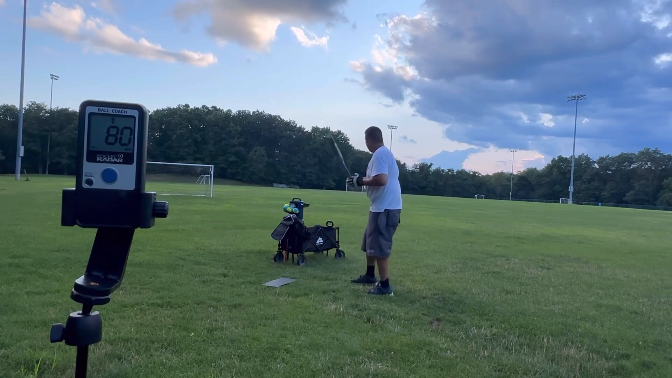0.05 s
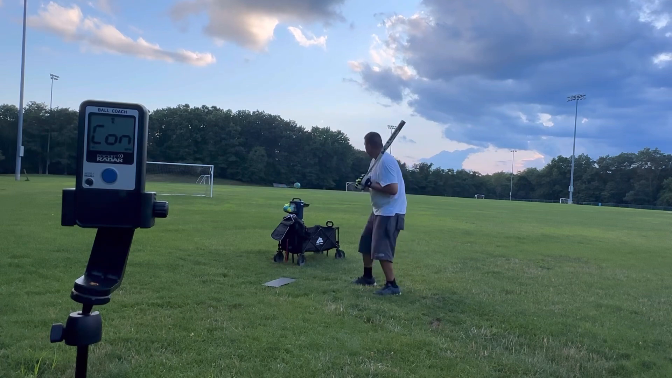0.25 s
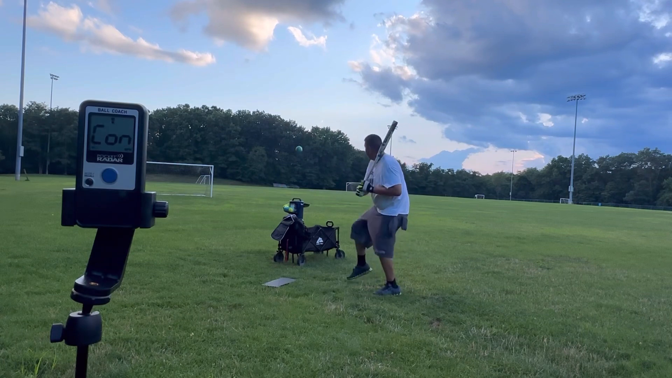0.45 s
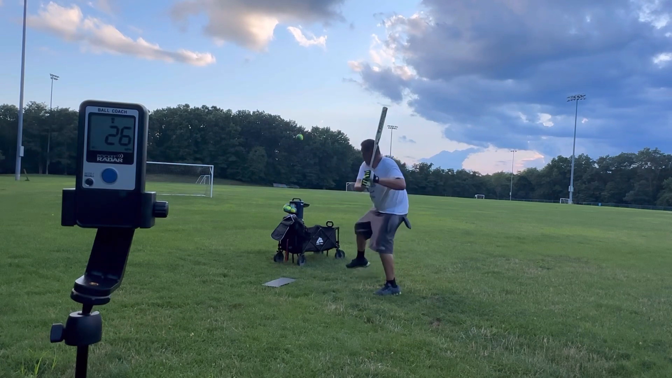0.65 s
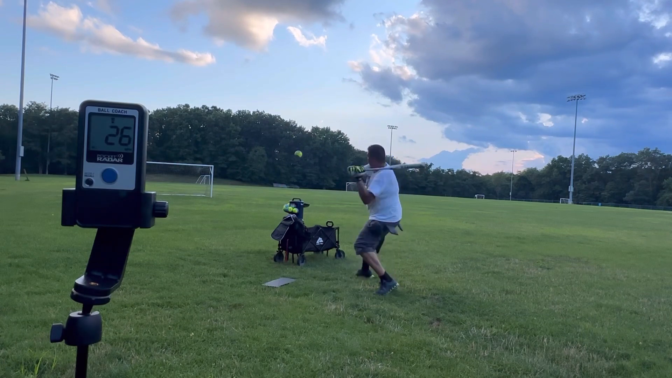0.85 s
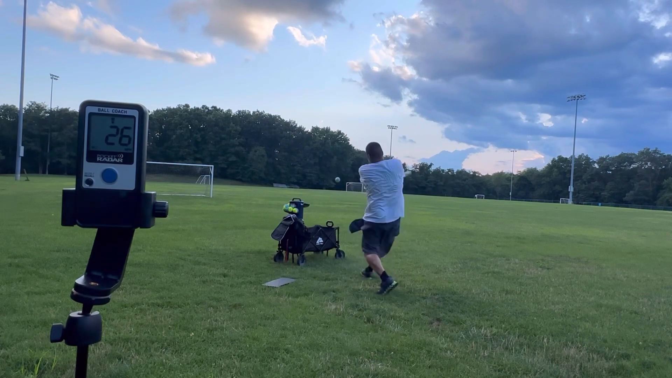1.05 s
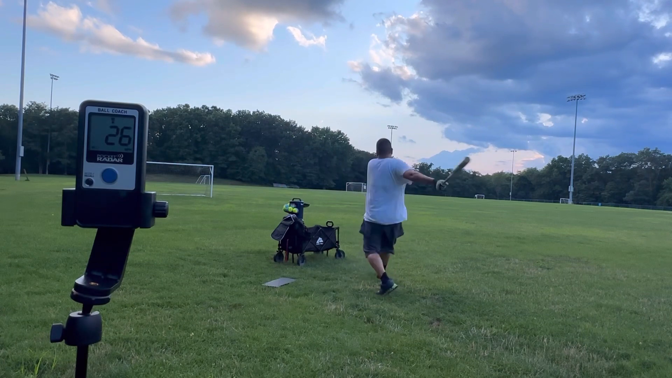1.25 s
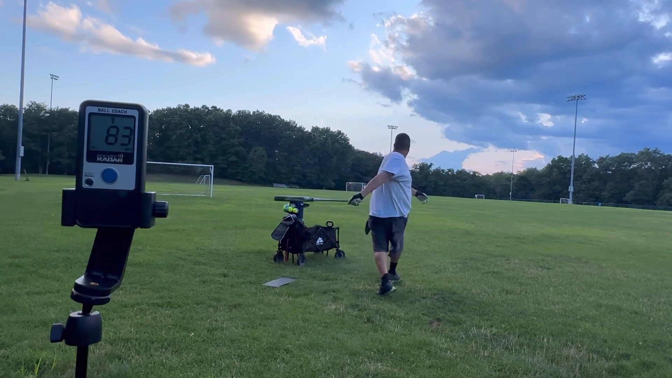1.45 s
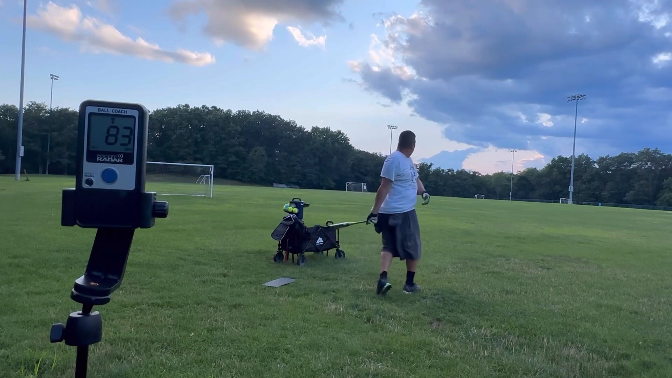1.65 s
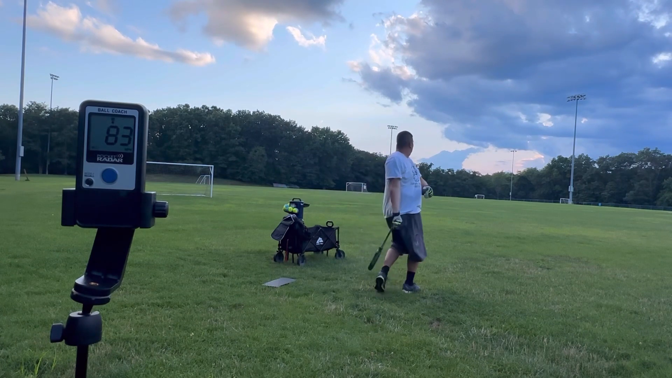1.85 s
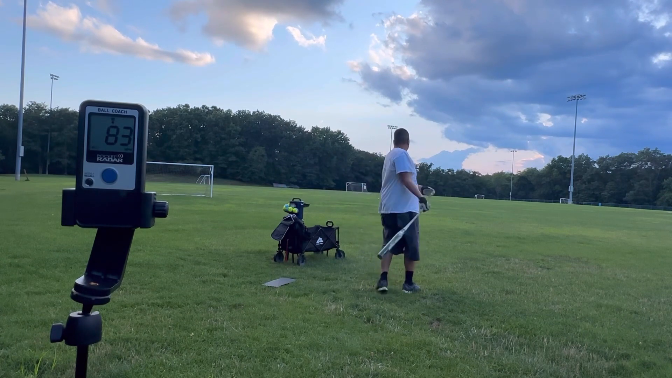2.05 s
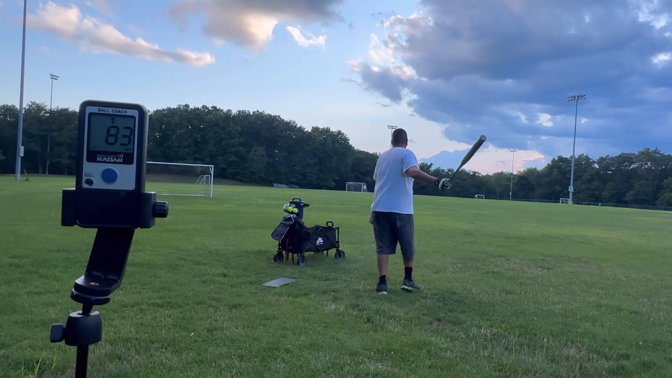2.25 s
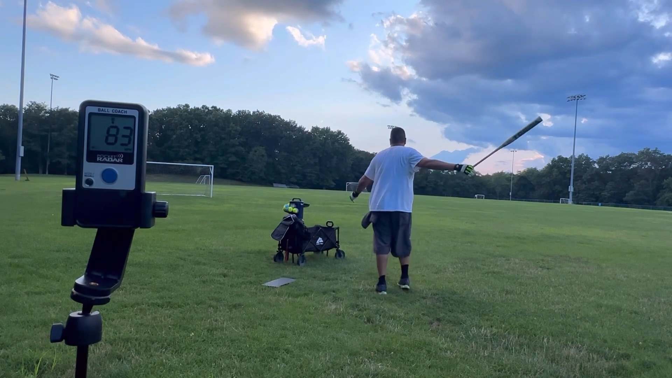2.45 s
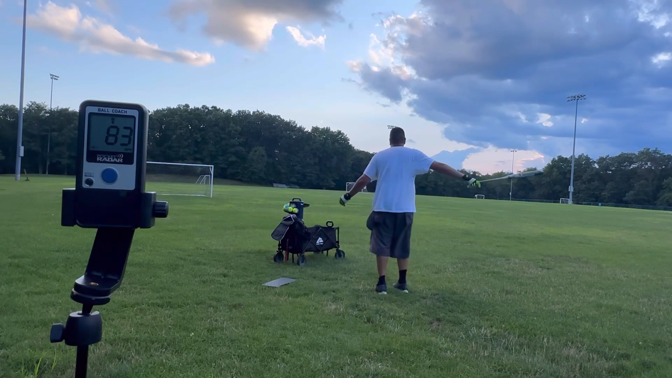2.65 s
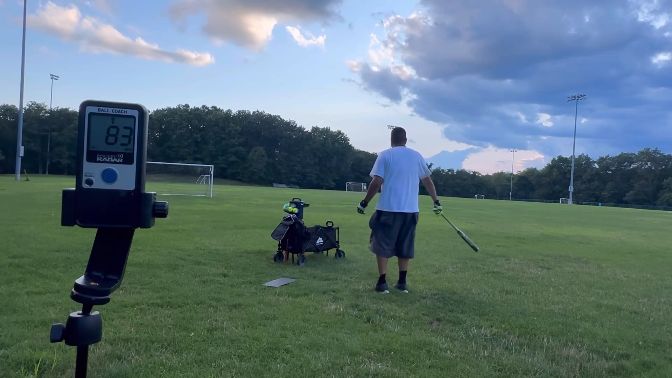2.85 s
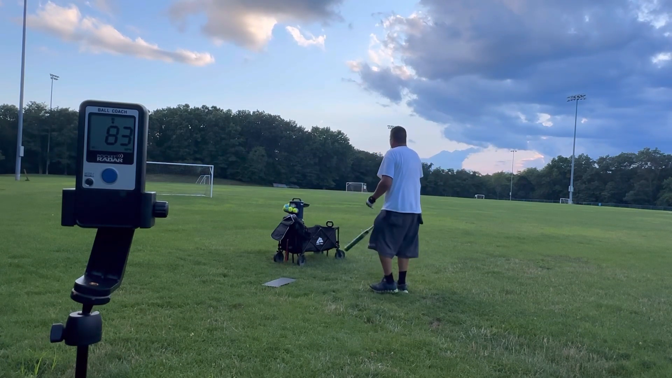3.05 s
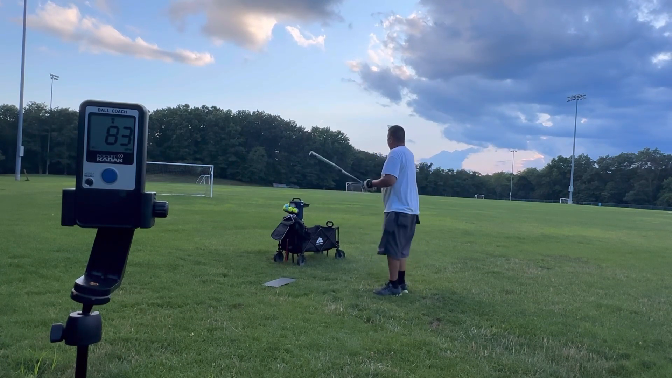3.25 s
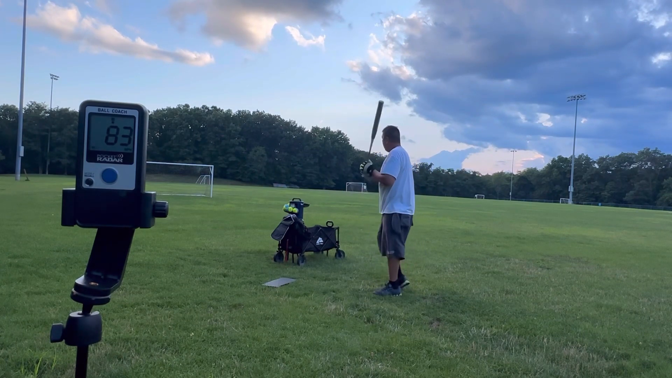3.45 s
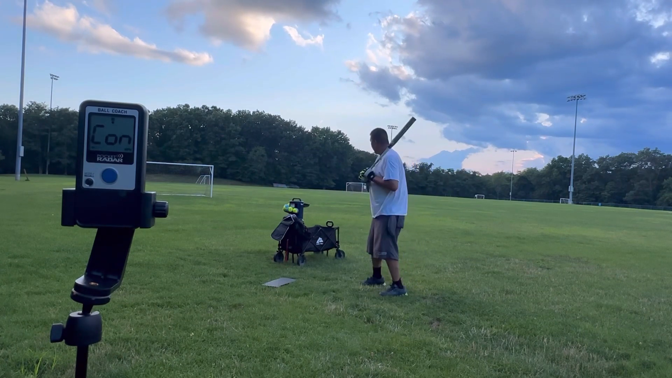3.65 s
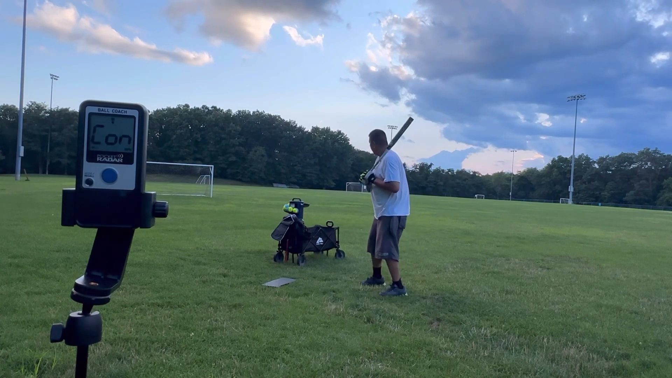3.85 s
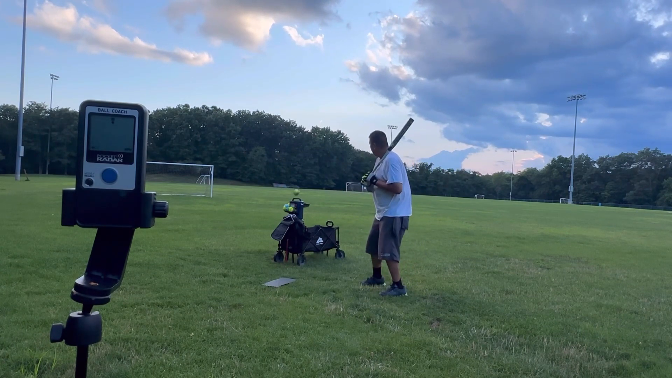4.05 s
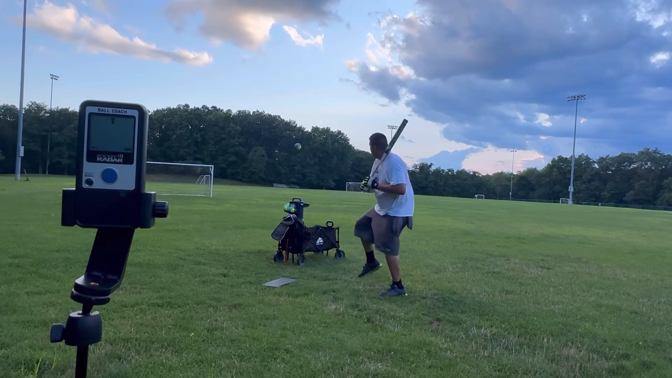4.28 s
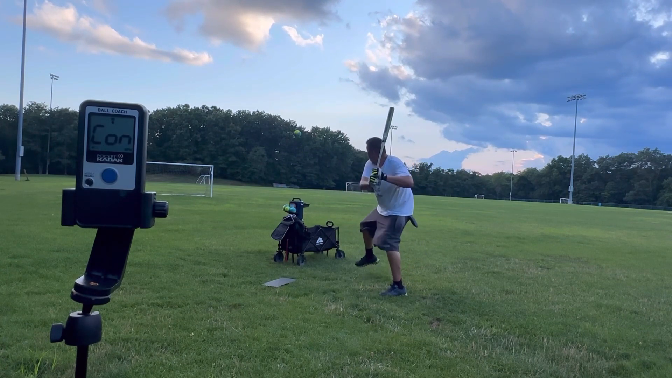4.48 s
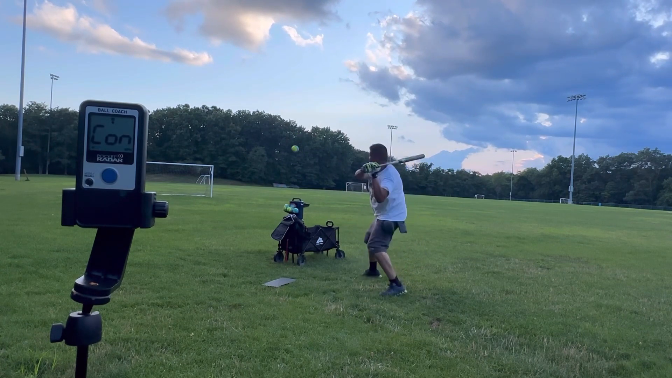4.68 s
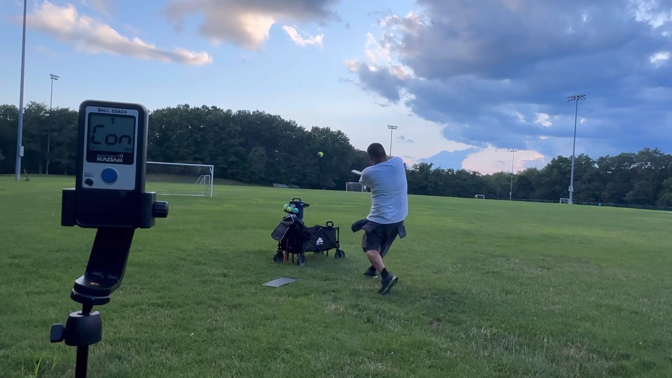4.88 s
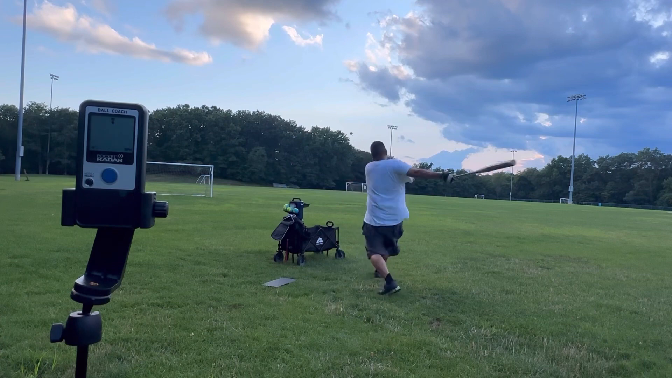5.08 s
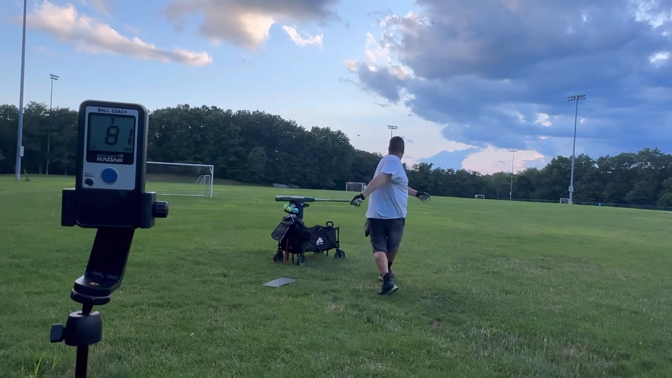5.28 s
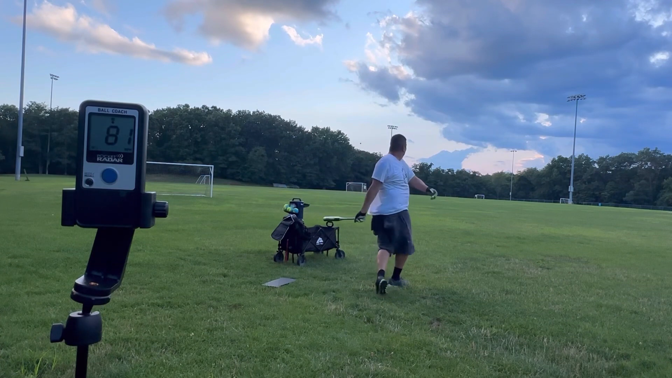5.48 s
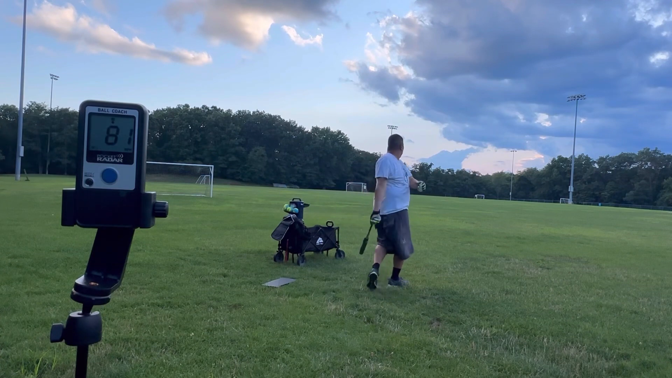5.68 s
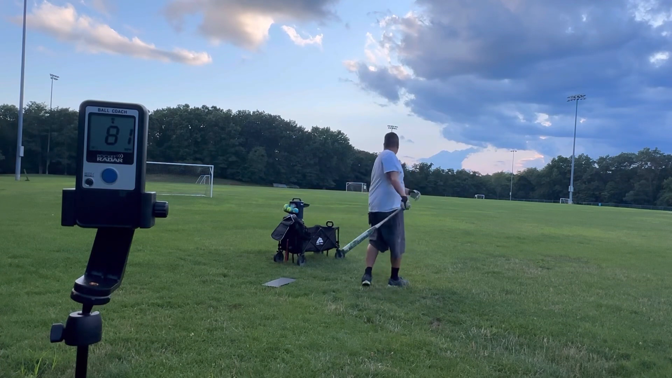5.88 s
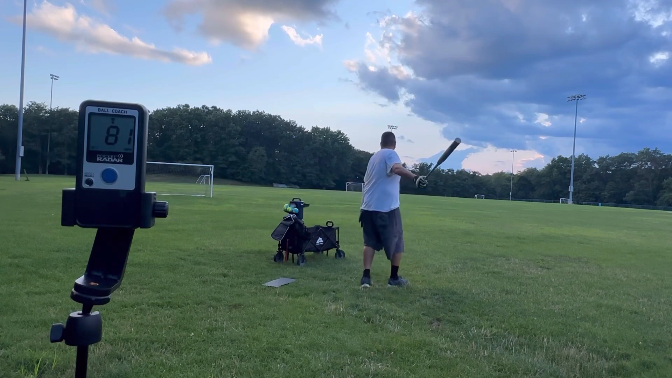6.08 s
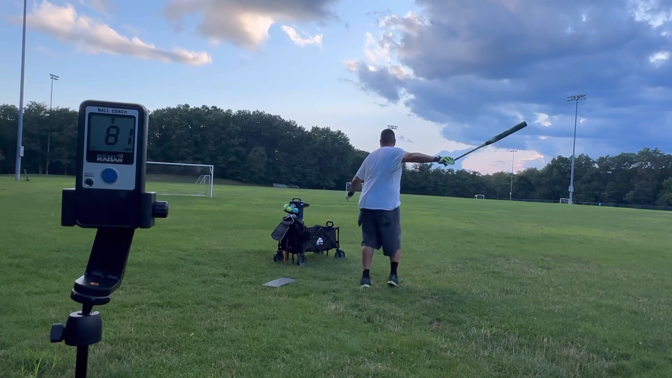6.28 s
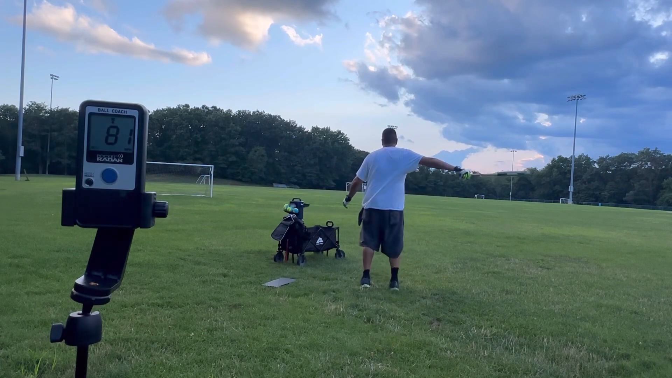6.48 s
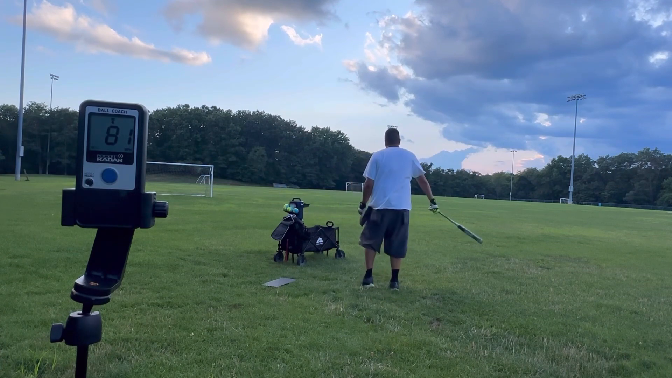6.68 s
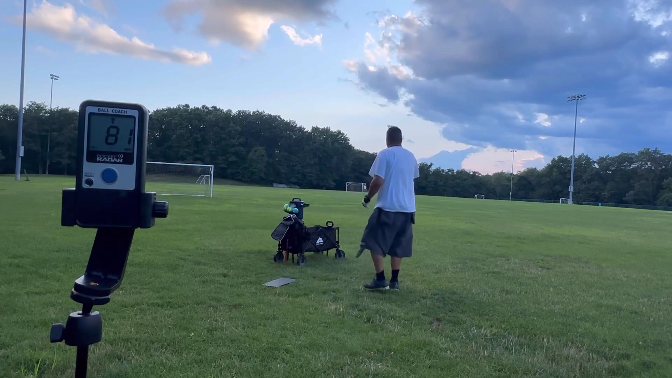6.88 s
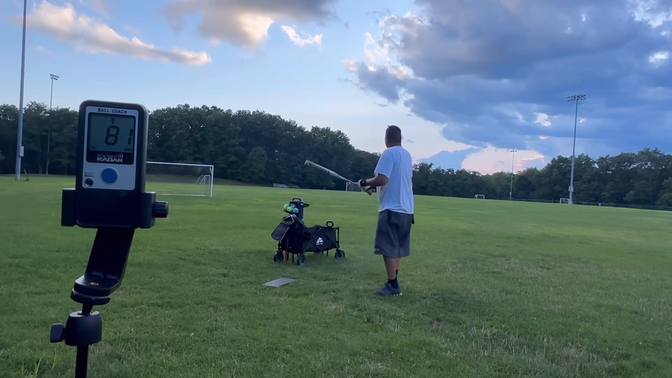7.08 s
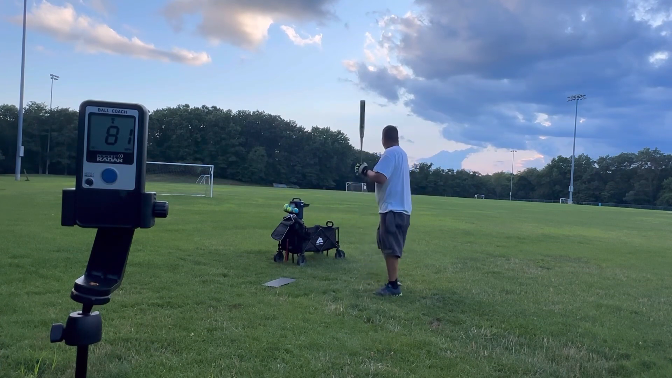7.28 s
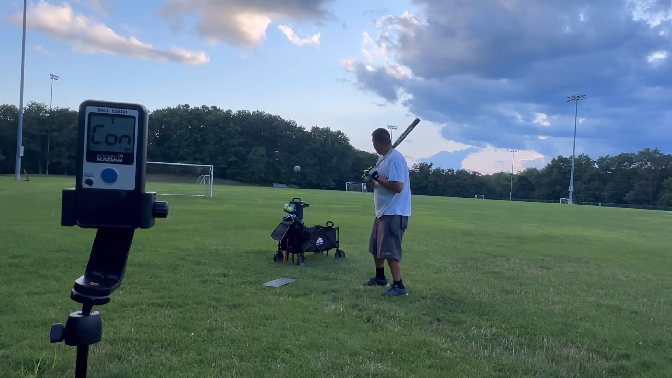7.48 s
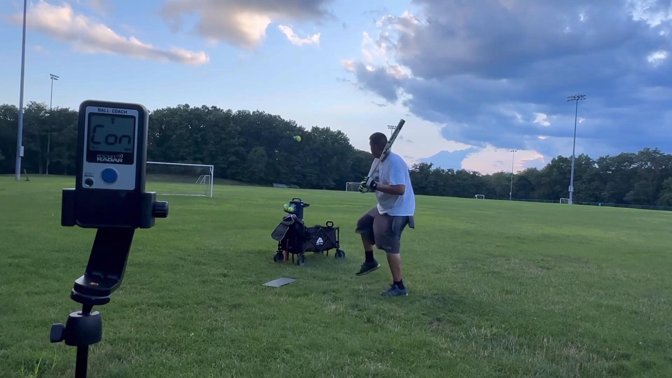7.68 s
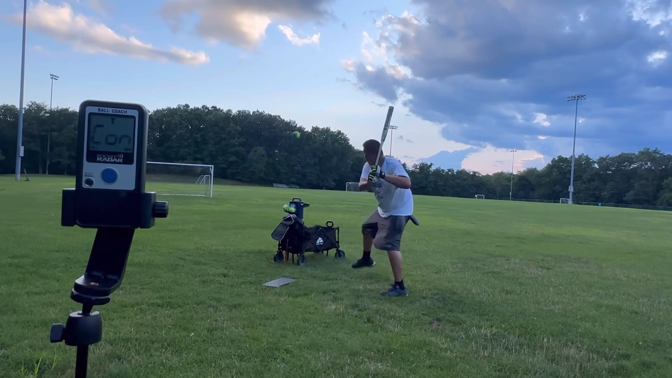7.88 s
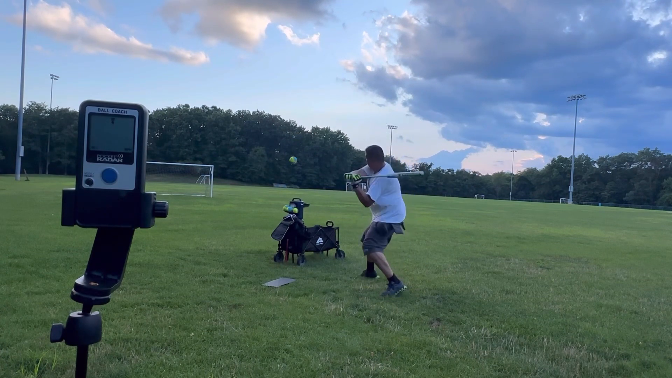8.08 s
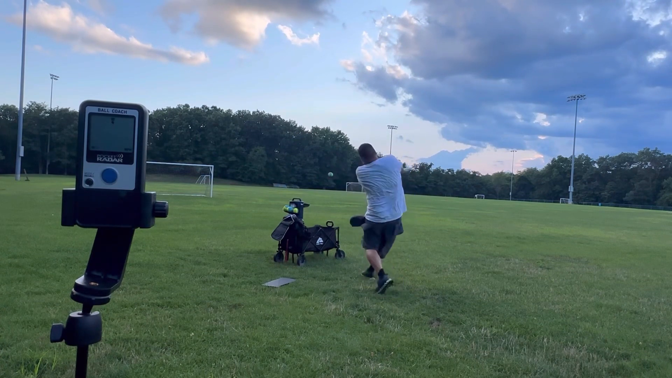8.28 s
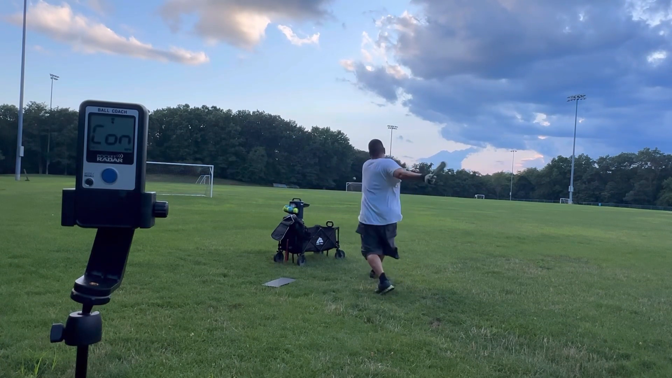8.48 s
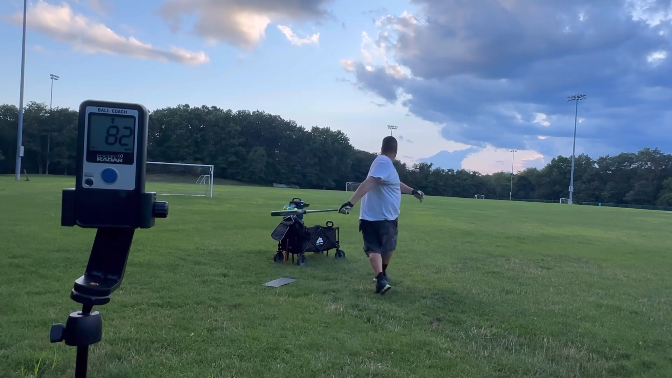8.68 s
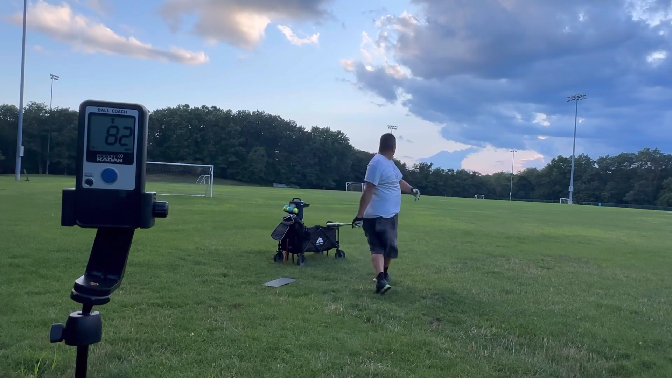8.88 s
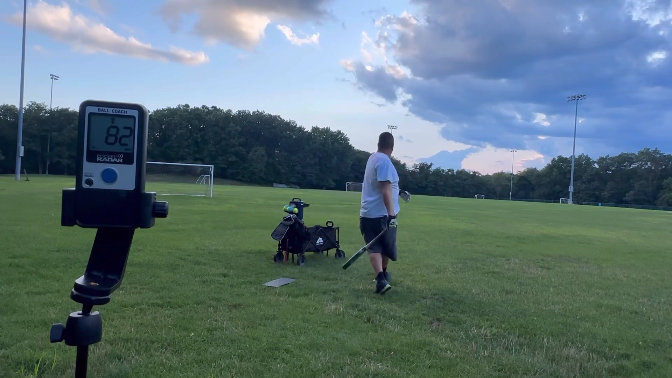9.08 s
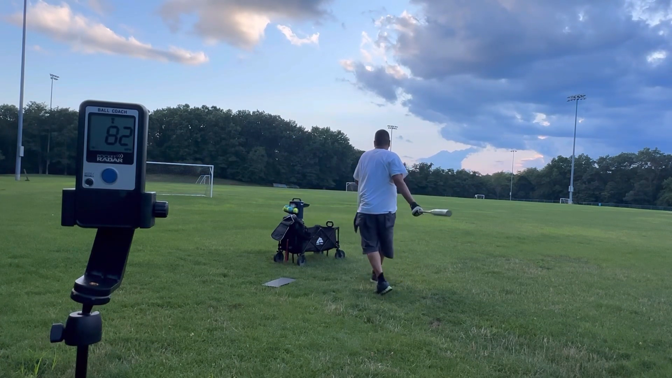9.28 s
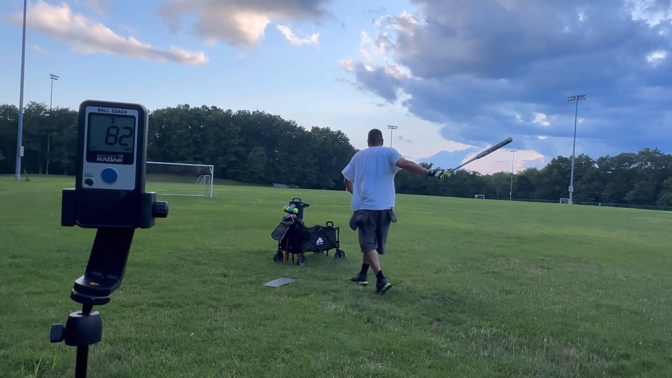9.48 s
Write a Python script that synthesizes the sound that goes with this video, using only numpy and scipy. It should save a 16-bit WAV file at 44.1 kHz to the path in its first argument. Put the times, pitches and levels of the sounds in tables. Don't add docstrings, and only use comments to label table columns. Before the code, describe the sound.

A bat cracks three softballs on an open grass field, with feeder-arm thumps, a faint motor whir, soft ball knocks and dull tree-line echoes.

```python
import sys
import numpy as np
from scipy import signal
from scipy.fft import rfft, irfft, next_fast_len
from scipy.io import wavfile
from scipy.ndimage import uniform_filter1d

SR = 44100
rng = np.random.default_rng(int(sys.argv[2]) if len(sys.argv) > 2 else 0)


def elevation(decibels):
    levels = np.asarray(decibels, float)
    return 10 ** (levels / 20)


def persist_wave(psi):
    counts = np.round(np.clip(psi, -1, 1) * 32767).astype(np.int16)
    wavfile.write(sys.argv[1], SR, np.atleast_2d(counts).T)


N = 420273
LEAD = 256

# (t/s, peak level/dB, barrel ring/dB, knock/dB, crack/dB, ball thud/dB, zing f/Hz)
HITS = [
    (0.979, -4.5, 6, -2.5, 2, 2.5, 7090),
    (4.837, -3.5, 5, -2.5, -1, -2.5, 8230),
    (8.203, -3, 3, 0.5, -1, -4, 8380),
]


def rms_one(x):
    return x / np.sqrt(np.mean(x ** 2) + 1e-20)


def at_hz(points, hz):
    points = np.array(points)
    return np.interp(np.log(hz), np.log(points[:, 0]), points[:, 1])


def drift(rate):
    r = np.exp(-80 * np.pi * rate / SR)
    slow = signal.lfilter([1], [1, -2 * r, r * r], rng.standard_normal(N // 40 + 2002))[2000:]
    return np.interp(np.arange(N) / 40, np.arange(len(slow)), rms_one(slow))


def ring(clicks, hz, t60):
    r = elevation(-60 / (t60 * SR))
    w = 2 * np.pi * hz / SR
    return signal.lfilter([0, np.sin(w)], [1, -2 * r * np.cos(w), r * r], clicks)


def band(x, low_hz, high_hz):
    sos = signal.butter(2, [low_hz, min(high_hz, .45 * SR)], "band", fs=SR, output="sos")
    return signal.sosfilt(sos, x)


def split(x, hz):
    return [signal.sosfilt(signal.butter(4, hz, kind, fs=SR, output="sos"), x) for kind in ("low", "high")]


def colour(x, spectrum):
    hz = np.maximum(np.fft.rfftfreq(x.shape[-1], 1 / SR), 1)
    return rms_one(irfft(rfft(x) * elevation(at_hz(spectrum, hz)), x.shape[-1]))


def pan(x, db):
    return x * elevation(np.array([[db / 2], [-db / 2]]))


def late(x, s):
    return np.interp(np.arange(len(x)) - s * SR, np.arange(len(x)), x, left=0)


def add(out, s, sound):
    i = round(s * SR)
    out[:, i:i + sound.shape[1]] += sound[:, :out.shape[1] - i]


def swells(t, rows, base_db=-150):
    power = elevation(2 * base_db)
    for s, db, rise, hold, fall in rows:
        away = np.maximum((s - t) / rise, (t - s - hold) / fall)
        power = power + elevation(2 * (db - 20 * np.maximum(away, 0)))
    return np.sqrt(power)


def slow_swells(rows, base_db):
    t = np.arange(N) / SR
    return np.interp(t, t[::64], swells(t[::64], rows, base_db))


def noise(spectrum, patchy_db, alike_hz):
    out = 0
    white = rng.standard_normal((2, 2, N))
    lowest, highest = spectrum[0][0], spectrum[-1][0]
    edges = np.geomspace(lowest, highest, int(1.7 * np.log2(highest / lowest)) + 1)
    for k, (low, high) in enumerate(zip(edges, edges[1:])):
        mid, side = band(white[k % 2], low, high)
        hz = np.sqrt(low * high)
        alike = 1 / (1 + (hz / alike_hz) ** 2)
        gain = elevation(at_hz(spectrum, hz) + patchy_db * drift(3.3))
        out = out + gain * (np.sqrt(1 + alike) * mid + np.sqrt(1 - alike) * side * [[1], [-1]])
    return rms_one(out)


def ports(x):
    # (f/Hz, level difference/dB, left lead/rad)
    port_gap = [(200, -1, .2), (500, -.5, .4), (750, 1.5, .35), (1450, 5, .6), (1900, 4.5, .8),
                (2600, 6, .2), (3300, 7, -.9), (4600, 5, -1), (5900, 4, -4.2), (7200, -1, -5.3),
                (8400, 0, -5.2), (9000, 0, -4.9), (9800, 0, -3), (12000, 1, -.2), (13200, 1, .6),
                (14200, .5, 2.6), (16400, .5, 3.2)]
    size = next_fast_len(x.shape[-1])
    hz = np.maximum(np.fft.rfftfreq(size, 1 / SR), 1)
    phase = at_hz(np.array(port_gap)[:, ::2], hz)
    half = elevation(at_hz(port_gap, hz) / 2) * np.exp(.5j * phase)
    shifted = np.roll(x, LEAD, axis=-1)
    return irfft(rfft(shifted, size) * np.array([half, 1 / half]), size)[:, :x.shape[-1]]


def field(sound, spectrum, scatter_db, echo_db):
    # (delay t/s, level/dB, rise/s, hold/s, fall/s)
    returns = [
        (.004, 8.5, .0012, .0005, .01),
        (0.031, 4.5, 0.004, .006, 0.091),
        (0.135, -20, 0.04, 0.038, 0.045),
        (.35, -29.5, .15, .27, .18),
        (0.798, -49, 0.27, 0.3, .1),
    ]
    # (delay t/s, level/dB, left-right level/dB)
    echoes = [(.0345, -14, -4.), (.054, -17, -3.), (.014, -28, -2.), (.031, -22, -3.), (.043, -26, -2.),
              (.073, -33, -2.), (.157, -36, -2.1)]
    t = np.arange(52920) / SR
    white = rng.standard_normal((2, len(t)))
    white[1] -= band(white[0] + white[1], 450, 1200)
    scatter = colour(white, spectrum)
    highs = signal.sosfilt(signal.butter(2, 2500, "high", fs=SR, output="sos"), scatter)
    clumps = np.repeat(rng.standard_normal((2, len(t) // 90)), 90, axis=1)
    clumps_db = 2 * uniform_filter1d(clumps, 90)
    dull = (scatter - highs) * elevation(1.6 * clumps_db[0])
    bright = highs * elevation(0.66 * clumps_db[1] - 28 * t)
    answer = pan(swells(t, returns) * elevation(scatter_db), -3.6) * (dull + bright)
    for delay_s, db, pan_db in echoes:
        facets = rng.standard_normal(512) * (rng.random(512) < .03) * np.exp(-t[:512] / 0.002) * 0.37
        facets[0] = 1
        echo = np.convolve(band(sound, 1100 - 2800 * delay_s, 2900), facets)
        add(answer, delay_s, pan(echo * elevation(db + echo_db - 6.5), pan_db))
    return answer


def air():
    # (f/Hz, level per Hz/dB)
    traffic = [(15, -43.5), (25, -14), (40, -1.5), (65, 4.5), (218, -8.5), (281, -23.5), (362, -23.5),
               (397, -31), (600, -31.5), (780, -60.5), (1320, -120)]
    wind = [(70, -25), (140, 4), (250, -3), (380, -4), (480, -43.5), (700, -53.5)]
    grass = [(400, -21), (700, 1), (1000, 17), (1500, -4.5), (2500, -26.5), (4000, 3)]
    leaves = [(1500, -8.5), (2500, 1.5), (5000, 0), (6500, -6.5), (7800, -7.5), (9500, -28), (11000, -27),
              (14500, -15.5)]
    # (t/s, peak level/dB, rise/s, hold/s, fall/s)
    gusts = [(.38, -48, 1.2, 0.074, 0.69), (0.836, -45, 0.77, 0.14, 0.75), (1.6, -47, 1.2, 0.36, 1),
             (2.605, -52, .8, 0.65, 0.82), (3.15, -48, 0.31, 0.44, 0.45), (4.15, -48.5, 0.6, 0.085, 0.26),
             (4.743, -50, 0.5, 0.14, 0.53), (5.8, -57, 0.98, 0.052, 0.49), (6.45, -58, 0.37, 0.64, .8),
             (7.45, -49, 0.36, 0.081, 0.26), (8.105, -48, 0.2, 0.075, 0.43), (8.9, -55.5, 1, 0.55, 0.87)]
    moves = [(.28, -54, 0.27, 0.16, 0.35), (3.42, -59.5, 0.28, 0.4, 0.39), (4.17, -56, 0.25, 0.072, 0.2),
             (4.41, -61, .03, 0.039, 0.092), (0.61, -61, 0.26, 0.13, .1), (4.72, -57.5, .1, .05, .1),
             (7.8, -58, .15, 0.047, 0.091), (8.1, -53, 0.11, .05, 0.1006), (8.3, -60, 0.48, 0.23, 0.29)]
    rustles = [(.05, -60.5, 0.46, 0.26, 0.075), (1.12, -59, 0.54, .05, 0.5),
               (1.602, -63.5, 0.72, 0.34, 0.39), (2.7, -68, 0.93, 0.28, 0.45),
               (3.352, -61.5, 0.16, 0.41, 0.29), (4.4, -66.5, .04, 0.29, .3),
               (4.75, -65.5, 0.27, 0.11, 0.41), (5.42, -55, .05, 0.036, 0.053),
               (4.997, -60.5, 0.25, 0.16, 0.21), (5.57, -65.5, 0.27, .05, 0.85),
               (7.102, -64, 0.35, 0.33, 0.15), (8.3, -53, 0.18, 0.073, 0.29), (8.97, -60.5, .2, .03, 0.27),
               (9.502, -66, 0.66, 0.11, 0.33)]
    # (t from contact/s, peak level/dB, rise/s, hold/s, fall/s)
    swing_move = (-.05, -58, .11, .12, .2)
    follow_move = (.25, -59, 1, -0.3, 3.9)
    swings = [(hit[0] + s, *shape) for hit in HITS for s, *shape in (swing_move, follow_move)]
    out = elevation(-47.5) * noise(traffic, patchy_db=1, alike_hz=334)
    rumble = noise(wind, patchy_db=2.5, alike_hz=320)
    rumble = signal.sosfilt(signal.butter(6, 426, fs=SR, output="sos"), rumble)
    out = out + slow_swells(gusts, base_db=-69.5) * rumble
    brushing = noise(grass, patchy_db=1.5, alike_hz=800)
    out = out + elevation(-4) * slow_swells([*moves, *swings], base_db=-64) * brushing
    rustling = noise(leaves, patchy_db=1, alike_hz=2000)
    return out + elevation(-3) * slow_swells(rustles, base_db=-77) * rustling


def motor():
    # (f/Hz, level per Hz/dB)
    whir_spectrum = [(250, -22.5), (400, -8), (600, -13.5), (925, -6.5), (1250, -15.5), (2200, -13),
                     (3200, -27), (4300, -23), (6000, -23), (9300, -20.5), (11500, -34.5), (13200, -27),
                     (14500, -27)]
    # (f/Hz, width/Hz, level/dB)
    housing = [(769, 14, -72), (935, 28, -61.5), (730, 20, -74), (2202, 130, -69), (3614, 110, -74.5),
               (1530, 56, -74.5), (2781, 89, -75.5), (3800, 85, -80.5), (4520, 50, -88), (8100, 100, -83),
               (13170, 900, -89)]
    # (multiple of its f, level/dB)
    orders = [
        (1, -66),
        (2, -68.5),
        (3, -70.5),
    ]
    motor_hz, left_lag_s, front_hz = 363.3, 0.00042, 1800
    whir = elevation(-66) * noise(whir_spectrum, patchy_db=3.5, alike_hz=4930)
    white = rng.standard_normal(N) + .9 * rng.standard_normal((2, N))
    for hz, width_hz, db in housing:
        whir = whir + elevation(db) * rms_one(ring(white, hz, 2.2 / width_hz))
    turn = 2 * np.pi * np.cumsum(motor_hz * (1 + 0.0008 * drift(3))) / SR
    for k, db in orders:
        whir = whir + elevation(db + 2 * drift(3)) * np.sin(k * turn)
    lows, highs = split(whir, front_hz)
    return np.array([late(lows[0], left_lag_s) * elevation(-2.5), lows[1]]), highs


def feeder(rattle_db):
    # (delay t/s, level/dB)
    bounces = [
        (0, 3),
        (.0014, -2),
        (.0045, -4),
        (.0075, 5.5),
        (.0105, -3),
        (.016, -3.5),
        (.019, -5),
        (.031, -22),
    ]
    # (f/Hz, level/dB, t60/s, delay/s)
    body = [(143.8, -11, 0.3, 0.0041), (277, -1, 0.083, 0.00714), (246.5, -6, 0.19, 0.00608),
            (368, -6, 0.053, 0.00558), (510, -5.5, 0.065, 0.00338), (730, -11, 0.0058, 0.00229),
            (992, -6.5, 0.014, 0.001176), (1220, -13, 0.0083, 0.00304), (1483, -15, 0.028, 0.002016),
            (1950, -19, 0.0065, 0.001005), (2190, -19, 0.0091, 0.00117), (2570, -23.5, 0.01, 0.00096),
            (2820, -23.5, 0.014, 0.00101), (4140, -24.5, 0.004, 0.000574), (5770, -12.5, 0.00068, 0.000287),
            (7900, -25.5, 0.0024, 0.00012), (9500, -15, 0.0012, 0.00019), (11800, -32, 0.00078, 0.00036)]
    t = np.arange(16384) / SR
    hits = rng.random(len(t)) < 4000 / SR
    contacts = rng.standard_normal(len(t)) * hits * np.exp(-t / 0.021) * elevation(-10)
    for delay_s, db in bounces:
        jitter, sign = rng.uniform(-1, 1, 2)
        contacts[round(delay_s * (1 + .1 * jitter) * SR)] = elevation(db) * np.sign(sign)
    push = np.exp(-.5 * (t / 0.00014 - 3) ** 2)
    push = push / push.sum()
    out = 0
    for hz, db, t60, delay_s in body:
        if hz < 600:
            blow = push
        else:
            blow = contacts * elevation(rattle_db + 4 * rng.standard_normal(len(t)))
        out = out + late(ring(blow, hz, t60), delay_s) * elevation(db)
    return out


def thumps():
    # (t/s, peak level/dB, rattle/dB)
    releases = [
        (0.2311, -43, 4.5),
        (3.99, -18.5, -2),
        (7.3285, -18, -3),
    ]
    # (f/Hz, level per Hz/dB)
    return_colour = [(180, -31), (300, -5.5), (813, -29), (986, -13.5), (1220, -24), (2030, -22),
                     (2800, -24.5), (4120, -26.5), (14000, -42.5)]
    direct, answers = np.zeros((2, 2, N))
    for s, db, rattle_db in releases:
        sound = feeder(rattle_db)
        add(direct, s - LEAD / SR, elevation(db) * ports(sound))
        add(answers, s - .0015, elevation(db) * field(sound, return_colour, scatter_db=-25, echo_db=-42))
    return direct, answers


def clunks():
    # (t/s, peak level/dB, rise/s)
    snaps = [
        (.2325, -32, .00003),
        (8.9505, -32, .00012),
    ]
    # (peak level/dB, t60/s)
    latch_rattle = [
        (-51.5, 0.2),
        (-52.5, .03),
    ]
    hum_hz, hum_t60_s = 140, .12
    out = np.zeros((2, N))
    t = np.arange(8192) / SR
    for (s, db, rise), (rattle_db, t60) in zip(snaps, latch_rattle):
        hum = elevation(db - 60 * t / hum_t60_s) * (1 - np.exp(-t / rise)) * np.cos(2 * np.pi * hum_hz * t)
        add(out, s, pan(hum, -1.5))
        rattle = rms_one(band(rng.standard_normal(len(t)), 1100, 7200)) * elevation(rattle_db - 60 * t / t60)
        add(out, s - LEAD / SR, ports(rattle * (t < .15)))
    return out


def knocks():
    # (t/s, peak level/dB)
    ball_drops = [(0.271, -36.5), (0.32, -33), (0.362, -35), (0.388, -34), (.432, -31.5), (0.451, -33),
                  (0.538, -39), (4.195, -34.5), (4.228, -35.5), (4.25, -57), (4.291, -36.5), (7.442, -52),
                  (7.517, -41), (7.594, -46)]
    out = np.zeros((2, N))
    t = np.arange(4096) / SR
    push = np.exp(-.5 * (t / 0.00092 - 3) ** 2)
    for s, db in ball_drops:
        hz = 246 * (1 + 0.17 * rng.uniform(-0.82, 1))
        knock = ring(push, hz, t60=0.11)
        add(out, s, pan(elevation(db) * knock / np.abs(knock).max(), -1.4))
    return out


def scuffs():
    # (t/s, peak level/dB, thud/dB)
    roll_rows = [(0.307, -44, 2), (0.396, -44, -12), (0.415, -43, -17.5), (0.455, -46, -6),
                 (0.538, -77, -3), (4.183, -45, -15), (4.205, -58, -15), (4.221, -43.5, -3),
                 (4.248, -55, -12), (7.534, -44.5, -13)]
    # (t/s, peak level/dB, thud/dB)
    step_rows = [(0.771, -57, 13), (0.877, -41, -16), (1.507, -47.5, 10), (1.635, -55, 12),
                 (1.689, -55, 10), (4.724, -49, -7.5), (5.342, -51.5, -11), (5.377, -46.5, 7),
                 (5.579, -48, 3), (6.009, -59, -5), (7.945, -52, -12), (8.11, -46.5, 3.5), (8.76, -66, -5),
                 (8.949, -46.5, 3.5), (1.96, -46, -5), (4.655, -58, 8)]
    # (t/s, peak level/dB, thud/dB, hiss/dB, t60/s)
    drag_rows = [(1.55, -50.5, -5, -8.5, 1), (1.72, -57, 13, -8, 0.147), (1.94, -45, -1, -12.5, 0.08),
                 (4.38, -54, -9, -21, 0.093), (5.395, -41.5, -14, -21, 0.45),
                 (5.801, -43.5, -10, -16.5, 0.059), (8.968, -61, -2, -22.5, .25)]
    out = np.zeros((2, N))
    t = np.arange(8192) / SR
    rolls = [(*row, -51, 0.044, .004) for row in roll_rows]
    steps = [(*row, -12, 0.1, .001) for row in step_rows]
    drags = [(*row, 0.024) for row in drag_rows]
    for s, db, thud_db, hiss_db, t60, rise in rolls + steps + drags:
        grains = rng.standard_normal((2, len(t))) * elevation(1.5 * rng.exponential(1, len(t)))
        grains = grains[0] + .5 * grains
        puff = rms_one(band(grains, 320, 1800))
        puff = puff + elevation(thud_db) * rms_one(band(grains, 100, 730))
        puff = puff + elevation(hiss_db) * rms_one(band(grains, 2500, 6900))
        fade = elevation(db - 8 - 60 * np.maximum(t - rise, 0) / t60)
        add(out, s, puff * fade * np.minimum(t / max(rise, 1 / SR), 1))
    return out


def birds():
    # (t/s, peak level/dB, f/Hz)
    chirps = [(0.47, -67, 4000), (.57, -72, 4200), (1.47, -57, 4040), (3.46, -68, 4300),
              (4.062, -58.5, 4100), (4.351, -59, 4130), (5.955, -69, 4530), (7.154, -71, 4620),
              (7.87, -70, 4220), (7.905, -67, 4520), (8.577, -58.5, 4050), (6.04, -72, 4530),
              (6.075, -75, 4520), (7.25, -69, 4500), (2.89, -73, 4500)]
    chirp_s = .029
    out = np.zeros((2, N))
    t = np.arange(12288) / SR
    wake = elevation(-4 - 38 * t) * (t > chirp_s)
    for s, db, hz in chirps:
        level = np.clip(np.minimum(t, chirp_s - t) / .006, 0, 1)
        level = level + wake * rng.random(24).repeat(512)
        level = level * elevation(3 * rng.standard_normal(96).repeat(128))
        waver = .012 * rng.standard_normal(48).repeat(256)
        pitch = hz * (1.005 + waver - .3 * np.minimum(t, chirp_s))
        whistle = np.sin(2 * np.pi * np.cumsum(pitch) / SR)
        add(out, s, pan(elevation(db) * level * whistle, -4))
    return out


def ticks():
    # (t/s, peak level/dB)
    click_rows = [(0.8884, -62), (.897, -54), (1.5075, -64), (1.8906, -61), (2.134, -65), (3.648, -53),
                  (4.206, -66), (5.3802, -55), (5.4131, -55), (5.4649, -55), (5.8012, -57), (6.7446, -58),
                  (6.8927, -59), (7.9493, -61), (8.018, -62), (8.0471, -59), (9.417, -61)]
    # (f/Hz, level/dB, t60/s)
    modes = [
        (6370, 1.5, .003),
        (9140, 4.5, 0.0079),
        (12800, -10, .002),
    ]
    # (t/s, peak level/dB, f/Hz, share of pitch lost)
    falling_notes = [(2.42, -68.5, 7300, 0.202), (2.925, -67.5, 4500, .2), (6.006, -64, 3800, .3),
                     (7.195, -63, 3200, .2), (4.8, -60, 3900, .45), (1.503, -62, 4100, .15)]
    note_s = 0.0185
    out = np.zeros((2, N))
    clicks = np.full(N, 1e-18)
    t = np.arange(1024) / SR
    s, db = np.transpose(click_rows)
    clicks[(s * SR).astype(int)] = elevation(db)
    for start, level_db, hz, share in falling_notes:
        level = elevation(level_db) * np.sin(np.pi * np.minimum(t / note_s, 1))
        pitch = hz * (1 - share * t / note_s)
        add(out, start, pan(level * np.sin(2 * np.pi * np.cumsum(pitch) / SR), -2))
    return out + sum(elevation(mode_db) * ring(clicks, hz, t60) for hz, mode_db, t60 in modes)


def swing():
    t = np.arange(4410) / SR
    return band(rng.standard_normal((2, len(t))), 400, 9000) * elevation(-42 - 370 * t[::-1])


def rising_tone():
    t = np.arange(LEAD)[::-1] / SR
    return elevation(-15) * np.exp(-t / .0006) * np.sin(2 * np.pi * 9200 * t) * [[1], [.7]]


def bat(ring_db, knock_db, crack_db, thud_db, zing_hz, edge_db, top_db):
    # (f/Hz, level/dB, t60/s)
    barrel = [(544, -16.5, .012), (706, -13.5, 0.014), (1150, -13, 0.012), (1422, -3, 0.012),
              (1850, -5, 0.0079), (2720, -18.5, 0.005), (3110, -12, 0.0051), (4200, -16.5, 0.0037),
              (5140, -11.5, 0.004), (6200, -19, 0.0062), (7200, -17.5, 0.004), (9200, -18, 0.007),
              (10600, -21, 0.0028), (12900, -21, 0.0015), (14700, -24, .002), (15800, -19.5, .002)]
    t = np.arange(4096) / SR
    crackle = rng.standard_normal(len(t)) * np.exp(-t / 0.001) * elevation(-9)
    cracks_at = np.round(np.array([.0001, .0005, .0013]) * SR).astype(int)
    crackle[cracks_at] += elevation(np.array([-2, 1.1, -3])) * [1, -1, 1]
    jolts = np.exp(-.5 * ((t - .0011) / .00007) ** 2)
    jolts = jolts + np.exp(-.5 * ((t - .0024) / .00007) ** 2) * elevation(2.6)
    jolts = jolts / jolts.sum() * elevation(1)
    recoil = elevation(6) * late(jolts, .0105)
    thud = ring(jolts + recoil, hz=100, t60=.032) * elevation(-27 + thud_db)
    zing = (zing_hz, -15, 0.0047)
    out = 0
    for hz, db, t60 in [*barrel, zing]:
        if hz < 2000:
            blow = jolts * elevation(ring_db)
        else:
            blow = crackle * elevation(knock_db if hz < 5000 else crack_db)
        out = out + ring(blow, hz, t60) * elevation(db + edge_db * (3500 < hz < 7000) + top_db * (hz > 10000))
    return thud + band(out, 260, 18000)


def bright_return():
    # (delay t/s, level/dB, rise/s, hold/s, fall/s)
    return_swell = [
        (0.02, 0.503, .006, .012, .09),
    ]
    t = np.arange(8820) / SR
    hiss = rms_one(band(rng.standard_normal((2, len(t))), 5500, 8300))
    return hiss * swells(t, return_swell) * elevation(-39.5)


def tree_line():
    # (delay t/s, level/dB, rise/s, hold/s, fall/s)
    far_returns = [
        (0.144, -42.5, 0.027, .03, 0.028),
        (.36, -53, .15, .16, 0.11),
        (.6, -57.5, .1, .15, .2),
    ]
    t = np.arange(44100) / SR
    clumps_db = 4.5 * rng.standard_normal(len(t) // 225).repeat(225)
    grains = rng.standard_normal((2, len(t))) * elevation(clumps_db)
    tone = ring(grains, 1420, .006)
    tone = tone + elevation(-8) * ring(grains, 1750, .006)
    tone = tone + elevation(-6.5) * ring(grains, 760, 0.0067)
    return pan(rms_one(tone) * swells(t, far_returns), -1)


def hits():
    # (edge level at 3.5-7 kHz/dB, top level above 10 kHz/dB)
    crack_colours = [
        (1, -2),
        (-7.5, 9),
        (0, -1),
    ]
    # (f/Hz, level per Hz/dB)
    return_colour = [(180, -26), (300, -13), (600, -3), (1030, -11), (1320, -5), (1940, -9.5),
                     (2600, -10.5), (3630, -11), (6500, -10.5), (9000, -10), (11000, -26.5), (14000, -26.5)]
    direct, answers = np.zeros((2, 2, N))
    for (s, db, *strengths), crack_colour in zip(HITS, crack_colours):
        sound = bat(*strengths, *crack_colour)
        add(answers, s - .1, elevation(db) * swing())
        add(direct, s - LEAD / SR, elevation(db) * rising_tone())
        add(direct, s - .0002 - LEAD / SR, elevation(db) * ports(sound))
        add(answers, s, elevation(db) * field(sound, return_colour, scatter_db=-30, echo_db=5))
        add(answers, s, elevation(db) * bright_return())
        add(answers, s, elevation(db) * tree_line())
    return direct, answers


def insects():
    # (t/s, peak level/dB, rise/s, hold/s, fall/s)
    insect_swells = [
        (3.3, -70, 0.21, 0.43, 0.27),
        (7.055, -73, 0.26, 0.35, 0.19),
    ]
    # (f/Hz, width/Hz, level/dB)
    shimmer_bands = [
        (6500, 290, -4.5),
        (6940, 300, -3.5),
        (8000, 360, -4),
        (3650, 200, -1),
    ]
    white = rng.standard_normal((2, N))
    shimmer = 0
    for hz, width_hz, db in shimmer_bands:
        shimmer = shimmer + elevation(db + 2 * drift(8)) * rms_one(ring(white, hz, 2.7 / width_hz))
    return slow_swells(insect_swells, base_db=-90.5) * shimmer


def thinned(x):
    x = signal.sosfilt(signal.butter(2, [9650, 10450], "bandstop", fs=SR, output="sos"), x)
    x = x - .8 * signal.sosfilt(signal.butter(1, [5220, 5400], "band", fs=SR, output="sos"), x)
    return signal.sosfilt(signal.cheby2(12, 40, 14100, fs=SR, output="sos"), x)


def scene():
    whir, front = motor()
    thump_direct, thump_answers = thumps()
    hit_direct, hit_answers = hits()
    around = pan(air(), -0.63) + whir + thump_answers + hit_answers
    around = around + scuffs() + knocks() + birds() + ticks() + insects()
    around, top = split(around, 10600)
    front = front * elevation(-2.5) + top[0] + 0.18 * top
    front = ports(np.roll(front, -LEAD, axis=-1))
    return thump_direct + hit_direct + clunks() + thinned(around + front)


def band_limit(x):
    return signal.sosfilt(signal.butter(12, 16760, fs=SR, output="sos"), x)


def record(dry):
    x = signal.sosfilt(signal.butter(4, 45, "high", fs=SR, output="sos"), dry)
    x = 1.3 * np.tanh(x / 1.3)
    x = signal.sosfilt(signal.cheby2(10, 60, 16700, fs=SR, output="sos"), x)
    return band_limit(x)


dry = scene()
out = record(dry)
persist_wave(out)
```